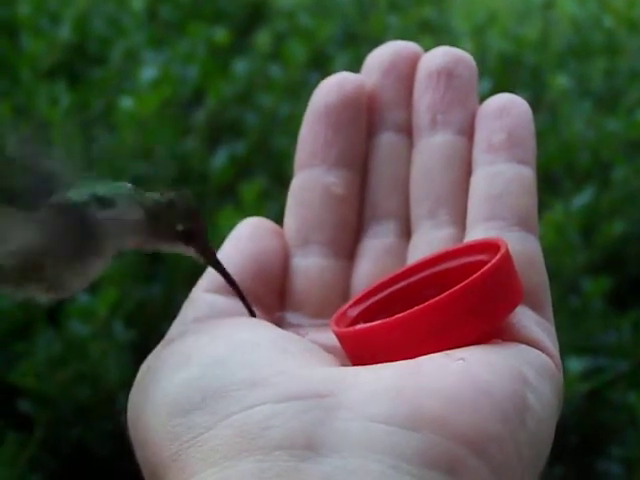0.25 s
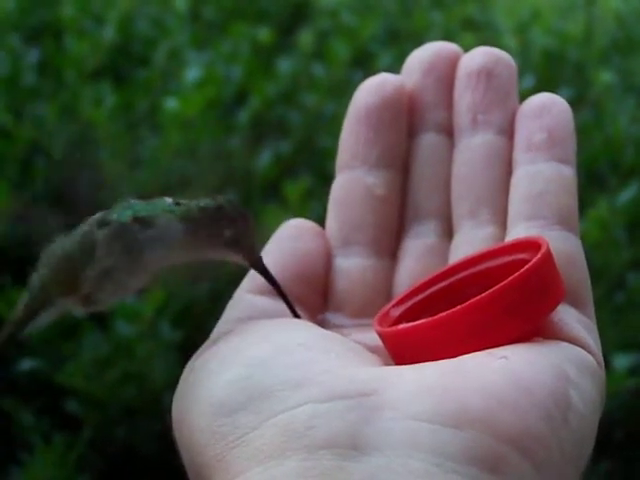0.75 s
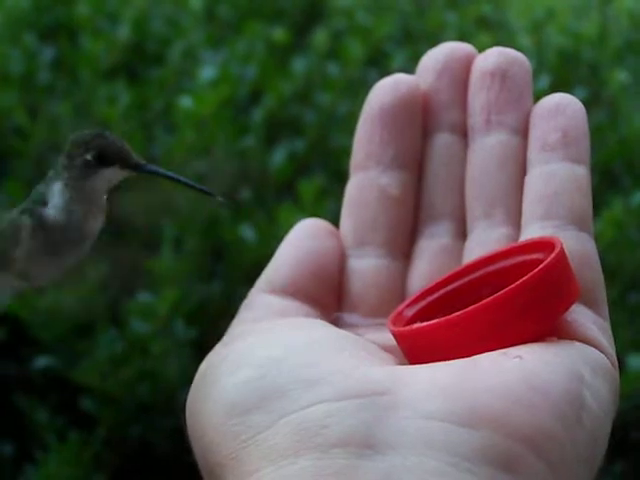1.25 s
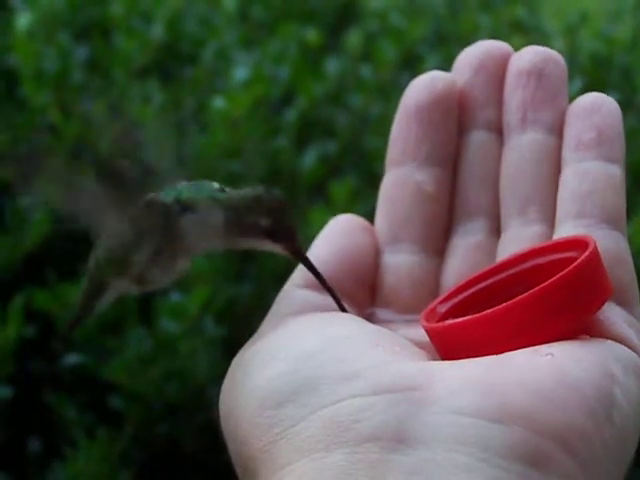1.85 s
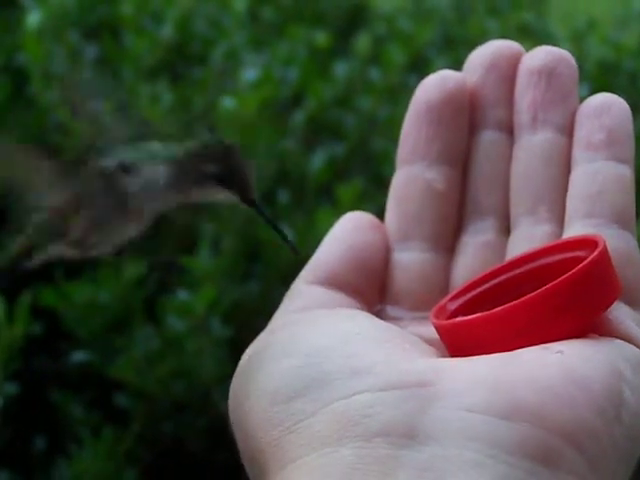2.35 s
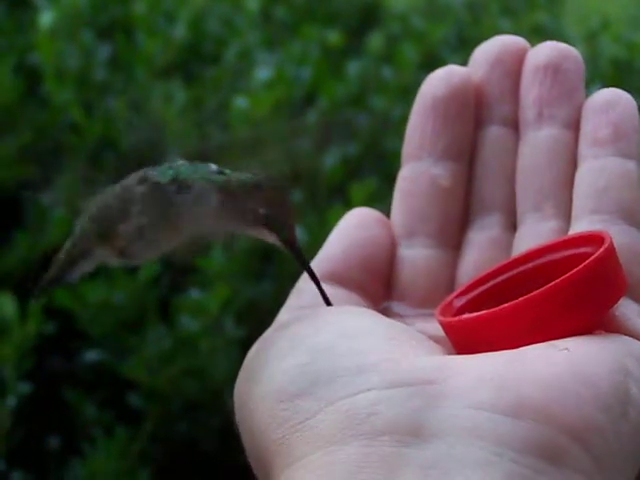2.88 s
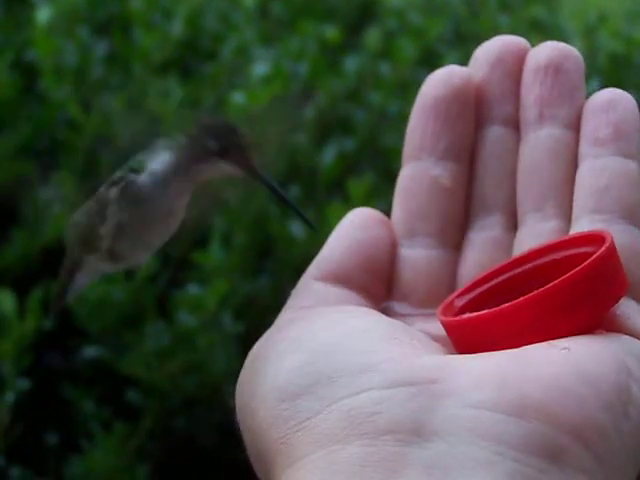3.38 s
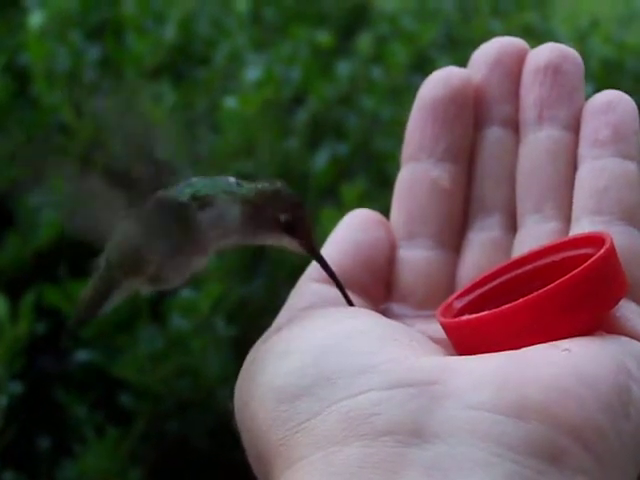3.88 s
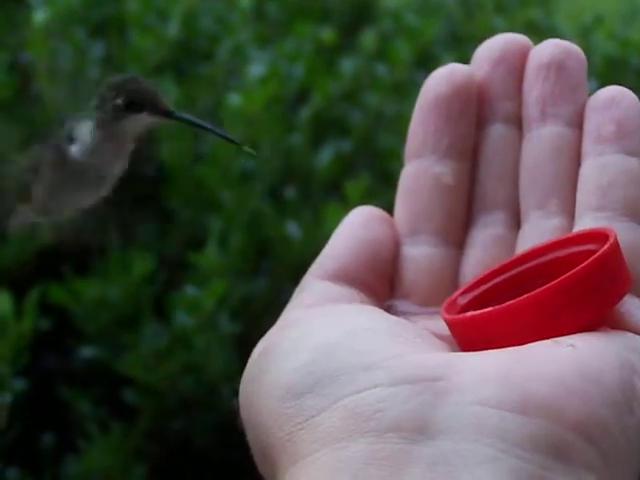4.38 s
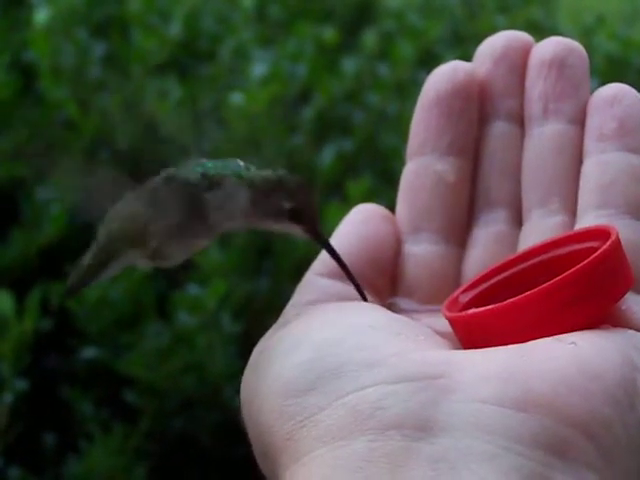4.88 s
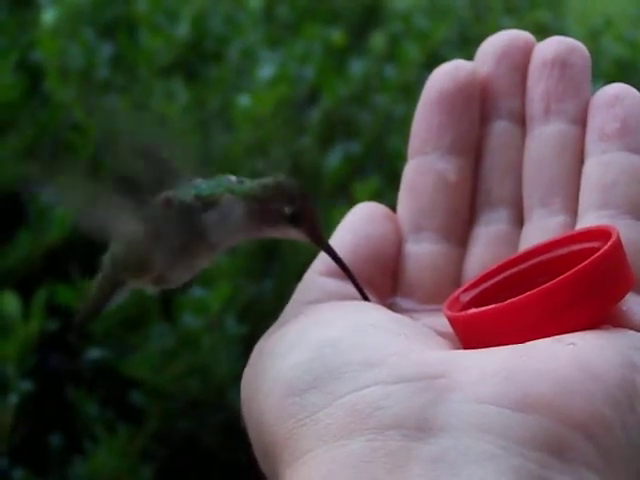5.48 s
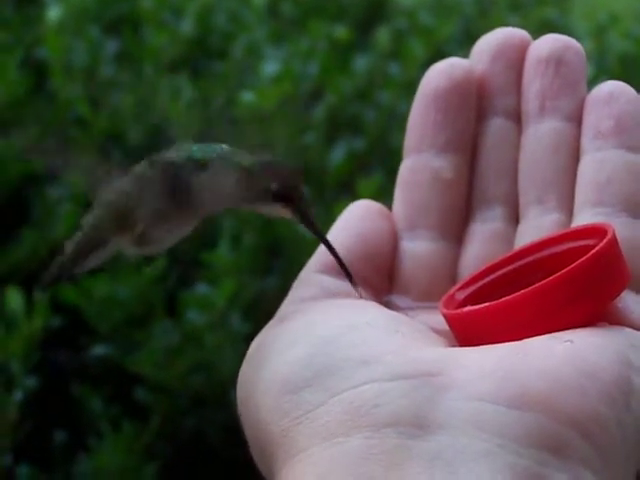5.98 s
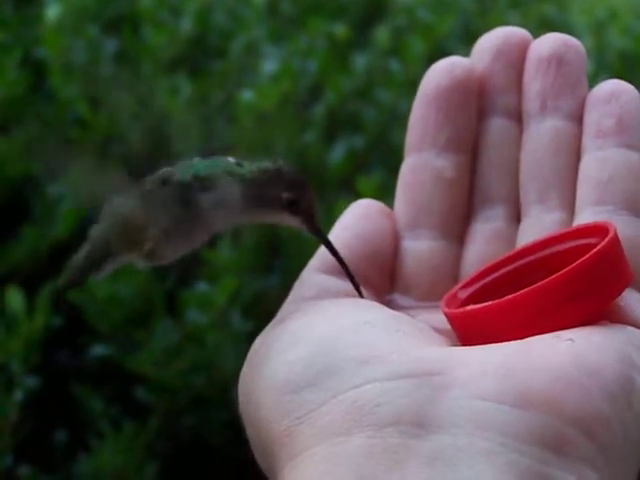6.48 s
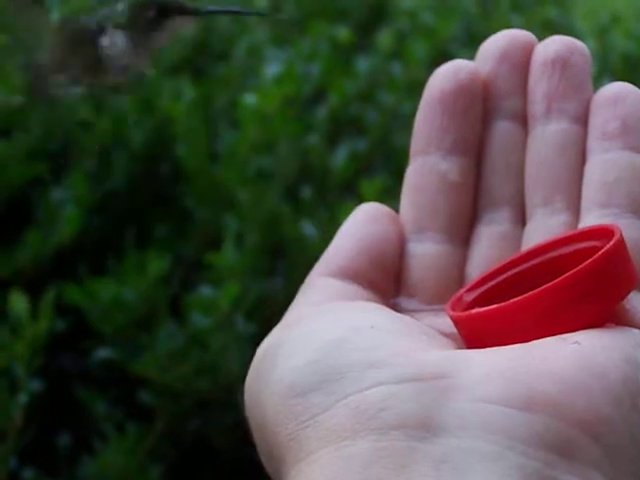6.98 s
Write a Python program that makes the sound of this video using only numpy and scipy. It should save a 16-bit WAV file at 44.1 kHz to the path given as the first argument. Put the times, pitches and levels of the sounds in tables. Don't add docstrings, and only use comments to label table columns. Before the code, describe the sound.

A hummingbird hovers close by with a low buzzing wing hum and airy feather whistle, flicking in quick darts over a faint insect drone.

```python
import sys
import numpy as np
from scipy import signal
from scipy.fft import rfft, irfft
from scipy.io import wavfile

SR = 44100
rng = np.random.default_rng(int(sys.argv[2]) if len(sys.argv) > 2 else 0)


def put_to_file(sound):
    columns = np.atleast_2d(sound).T
    safe = np.clip(columns, -1, 1)
    whole_steps = np.round(safe * 32767)
    wavfile.write(sys.argv[1], SR, whole_steps.astype(np.int16))


def gain_from_decibels(decibels):
    exponent = np.asarray(decibels, float) / 20
    return 10 ** exponent


N = 319725

# back_s, upright_until_s, dart_in_s, back_surge_beats_per_s, in_surge_beats_per_s
BREAKS = [
    (-0.4, 0.152, 0.273, 0.0, 3.05),
    (0.927, 1.308, 1.419, 2.18, 1.46),
    (1.955, 2.434, 2.416, 5.88, 0.9),
    (3.004, 3.433, 3.5, 2.54, 4.8),
    (4.141, 4.606, 4.583, 4.06, 2.69),
    (5.564, 5.887, 6.012, 2.6, 1.5),
    (6.83, 7.071, 7.067, 3.02, 4.0),
]
# time_s, nearness_db, side_on_db, effort_db
PLACE = [(0, -0.5, -1, 1), (.6, -0.5, 1.5, 1.5), (.9, 0.5, -1.5, -0.5), (1.5, -0.5, -2, 1),
         (1.9, 0.5, -1.5, -0.5), (2.3, -2, -3, 1.5), (2.45, -1, -11, 1.5), (3.0, 0, -9.5, -1),
         (3.45, -0.5, -3, 0), (3.7, 1, -1.5, -0.5), (4.1, 0, -4.5, -0.5), (4.7, -.5, -2.5, -0.5),
         (5.45, 0, 0.5, -0.5), (6.0, -1.5, -1, 1.5), (6.5, 1.5, 1, -1.5), (6.78, 0, 1.5, -1),
         (7.05, -4, -3, -5), (7.25, -5, -5, -4.5)]


def evened(x):
    return x / np.sqrt(np.mean(x ** 2) + 1e-20)


def columns(rows):
    s, *values = np.transpose(rows)
    return [np.interp(np.arange(N) / SR, s, v) for v in values]


def bumps(rows):
    s, length, *sizes = np.transpose(rows)
    t = np.arange(0, N + 99, 100) / SR
    bells = np.exp(-((t[:, None] - s) / length) ** 2)
    return [np.interp(np.arange(N) / SR, t, bells @ size) for size in sizes]


def coloured(points):
    hz, db = np.transpose(points)
    bins_hz = np.fft.rfftfreq(N, 1 / SR)
    gain = gain_from_decibels(np.interp(np.log(bins_hz + 1), np.log(hz + 1), db))
    return evened(irfft(rfft(rng.standard_normal(N)) * gain, N))


def wander(per_s):
    steps = rng.standard_normal(2000)
    return np.interp(np.arange(N) / SR * per_s, np.arange(2000), steps)


def resonate(x, hz, width):
    turn = np.exp(2j * np.pi * np.cumsum(hz * np.ones(N)) / SR)
    r = np.exp(-np.pi * width / SR)
    return 2 * (turn * signal.lfilter([1 - r], [1, -r], x / turn)).real


def ring(drive, hz, width):
    return resonate(resonate(drive, hz, width), hz, width)


def upright():
    tilt_s, lag_s = .08, .05
    t = np.arange(N) / SR
    pose = np.zeros(N)
    for back, until, *_ in BREAKS:
        pose += np.clip((t - back - lag_s) / tilt_s, 0, 1) * np.clip((until - t) / tilt_s, 0, 1)
    return pose


def wingbeat():
    # time_s, beats_per_s
    beat = [(0.0, 49.42), (0.08, 49.87), (0.33, 48.27), (0.604, 48.28), (0.809, 49.94), (1.483, 48.88),
            (1.78, 49.74), (2.63, 49.28), (3.646, 49.52), (3.93, 48.64), (4.78, 50.09), (5.47, 50.93),
            (6.08, 49.45), (6.706, 52.43), (6.88, 48.35), (7.25, 44.04)]
    first_turn, upright_sag_per_s, surge_s = .083, 2.994, .045
    darts = []
    for back, _, dart_in, back_surge, in_surge in BREAKS:
        darts += [(back, surge_s, back_surge), (dart_in, surge_s, in_surge)]
    rate = columns(beat)[0] - upright_sag_per_s * upright() + bumps(darts)[0]
    return first_turn + np.cumsum(rate) / SR


def hum_levels():
    # start_s, length_s, strength_db
    pushes = [
        (.15, .06, 6.5),
        (1.06, .06, 4),
        (1.3, .05, 8),
        (2.32, 0.047, 3.5),
        (3.35, .05, 2.5),
        (4.55, .04, 1.5),
        (5.72, .04, 3),
        (5.87, .04, 5),
        (6.95, .04, 6),
    ]
    # start_s, length_s, depth_db
    stalls = [
        (.25, .04, -4.5),
        (.94, .04, -3.5),
        (2.05, .04, -2),
        (3.05, .03, -2.5),
        (3.5, 0.056, -2.5),
        (4.16, 0.024, -7),
        (4.63, 0.035, -1.5),
        (5.61, 0.034, -4.5),
        (6.84, 0.054, -9),
        (7.06, .03, -4),
    ]
    # feeding_db, upright_change_db, db_per_push_db, db_per_stall_db, db_per_side_on_db
    lift = [-49.5, 0, 0.4, 1.5, 0]
    uneven = [-57.5, 2.5, 0.97, .6, 0.7]
    fourth = [-61.3, 4.5, .7, 1.8, 1.2]
    fifth = [-61, -2.5, 0.37, 1, -0.13]
    eighth = [-66.3, 0., .6, 2., .5]
    near_db, side_db, _ = columns(PLACE)
    pose = upright()
    controls = np.array([np.ones(N), pose, bumps(pushes)[0], bumps(stalls)[0], side_db * (1 - pose)])
    return near_db + np.array([lift, uneven, fourth, fifth, eighth]) @ controls


def hum(turns):
    # multiple, hum_level_followed (whole part, from 1), level_db against it
    minor = [(3, 1, -15.5), (6, 4.4, -10.5), (7, 4, -10), (8, 5, 0), (9, 2.9, -22), (10, 4, -18.5)]
    levels = hum_levels()
    odd_lead, even_lag = .4, .6 + .6 * upright()
    out = np.zeros(N)
    for k, follows, db in [(2, 1, 0), (1, 2, 0), (4, 3, 0), (5, 4, 0)] + minor:
        lead = 1.4 * np.log(k / 2)
        if k > 2:
            lead = lead + (odd_lead if k % 2 else -even_lag)
        flutter = 0.065 * abs(k - 2) * wander(25)
        gain = gain_from_decibels(levels[int(follows) - 1] + db + 0.22 * k * wander(20))
        out += np.sqrt(2) * gain * np.cos(2 * np.pi * k * turns + lead + flutter)
    return out


def stroke(turns, peak, rise, fall, vary_db):
    u = (turns - peak + .5) % 1 - .5
    size_db = vary_db * rng.standard_normal(500)[np.floor(turns - peak + 1.5).astype(int)]
    return gain_from_decibels(size_db) * np.exp(-(u / np.where(u < 0, rise, fall)) ** 2)


def feather_controls():
    # start_s, length_s, whistle_db, swish_db
    strains = [(.155, 0.036, 7.5, 5), (.5, .03, 4, 1.5), (.57, .03, -6.5, -1), (.68, 0.032, 3, 2),
               (.85, .04, 2.5, 2.5), (1.05, .04, 0.5, 2), (1.3, .04, 4, 4), (1.37, 0.031, -9, -5),
               (1.43, .03, -1.5, 4), (1.985, 0.037, 8, 8), (2.43, 0.035, 2.5, 4), (3.0, .04, 0, 3),
               (3.37, 0.032, 4, 1.5), (3.45, .03, -5, 0.5), (3.56, .05, 3.5, 1), (3.7, .03, 5, 3),
               (4.13, 0.034, -2, 5), (4.3, .04, 1, -1.5), (4.55, .03, -2, -3.5), (4.62, .04, 4, 2),
               (5.72, .04, 3.5, 0), (5.8, .025, -5, -5), (5.87, 0.038, 5.5, 2.5), (6.48, 0.035, -8, 0),
               (6.82, 0.044, -1, 5.5), (6.95, .03, 7, 0.5)]
    effort_db = columns(PLACE)[2]
    strain_db, swish_db = bumps(strains)
    pose = upright()
    whistle_level_db = -53 + effort_db + strain_db
    swish_level_db = -64 + 0.35 * effort_db + swish_db
    pitch_hz = 3575 - 60 * pose
    upstroke_db = -8.5 - pose
    tips_db = -8.5 - .6 * strain_db + 0.77 * swish_db + 1.7 * wander(9)
    return whistle_level_db, swish_level_db, pitch_hz, upstroke_db, tips_db


def feathers(turns):
    # pitch_factor, width_hz, level_db
    vane_modes = [
        (1., 365, 8),
        (0.875, 330, -2),
    ]
    # pitch_hz, width_hz, level_db
    tip_modes = [
        (3953, 220, 2.5),
        (4315, 170, -2.5),
    ]
    # pitch_hz, level_db
    swish_colour = [(1700, -40.5), (2100, -0.5), (2500, 5), (2850, 2), (3600, 8.5), (4600, 0.5), (5300, -2),
                    (6600, -2.5), (7200, -4.5), (8000, -12.5), (9300, -17)]
    # pitch_hz, level_db
    low_colour = [(600, -39.5), (900, -15), (1600, 3), (2000, -2), (2300, -41)]
    whistle_db, swish_db, hz, up_db, tips_db = feather_controls()

    down = stroke(turns, peak=.765 + .04 * upright(), rise=.04, fall=.14, vary_db=1.5)
    up = stroke(turns, peak=0.21, rise=.06, fall=.13, vary_db=2.)
    speed = down + gain_from_decibels(up_db) * up
    glide = .03 * np.sin(4 * np.pi * (turns - .84))
    pitch = hz * (1 + .014 * wander(50) - glide)
    flutter = np.cos(2 * np.pi * np.cumsum(pitch * (1 + .04 * wander(120))) / SR)
    turbulence = (speed + 0.1) * rng.standard_normal(N)
    drive = turbulence + .25 * speed * flutter

    vanes, tips = np.zeros(N), np.zeros(N)
    for k, (factor, width, db) in enumerate(vane_modes):
        vanes += (-1) ** k * gain_from_decibels(db) * ring(drive, pitch * factor, 1.45 * width)
    for k, (tip_hz, width, db) in enumerate(tip_modes):
        tips += (-1) ** k * gain_from_decibels(db) * ring(turbulence, tip_hz, 2.3 * width)
    whistle = gain_from_decibels(-1.13) * evened(vanes) + gain_from_decibels(tips_db - 1.9) * evened(tips)

    swish = evened(gain_from_decibels(-4.5) * down + up + 0.4) * coloured(swish_colour)
    low_stroke = stroke(turns, peak=.26, rise=0.038, fall=.07, vary_db=2.2)
    low = evened(low_stroke + 0.3) * coloured(low_colour)
    near_db = columns(PLACE)[0]
    return gain_from_decibels(whistle_db) * whistle + gain_from_decibels(swish_db + 6) * swish + gain_from_decibels(-69 + near_db) * low


def downwash():
    # pitch_hz, level_db
    wash = [(5, -0.5), (20, -5), (28, 1.5), (36, -3.5), (60, -10), (100, -40)]
    # pitch_hz, level_db
    rumble = [(20, -30), (45, 1), (65, 2.5), (150, 0), (250, -10), (420, -15), (600, -26.5), (1200, -50)]
    lumps_db = -61 + 1.5 * wander(12)
    rumble_db = -57.5 + .3 * columns(PLACE)[1] + 2.5 * wander(8.2)
    return gain_from_decibels(lumps_db) * coloured(wash) + gain_from_decibels(rumble_db) * coloured(rumble)


def insects():
    # pitch_hz, level_db
    air_colour = [(300, -30), (500, -9), (950, -10), (1550, -12), (2800, -12.5), (3570, -8), (4300, -14.5),
                  (4700, -12.5), (6600, -24.5), (8000, -32), (10000, -31.5)]
    # pitch_hz, width_hz, level_db
    crickets = [
        (5140, 170, -76),
        (5320, 30, -87),
        (5675, 25, -91),
    ]
    drift_db = .6 * wander(3)
    air = gain_from_decibels(-61.5 + drift_db) * coloured(air_colour)
    for hz, width, db in crickets:
        waver_db = 3 * wander(6)
        air = air + gain_from_decibels(db + waver_db) * evened(ring(rng.standard_normal(N), hz, width))
    return air


def snap(turns):
    # first_s, count_beats, peak_db, push 1 or suck -1
    bursts = [(.146, 3, -47.5, 1), (.4903, 2, -51, 1), (1.0383, 1, -50, 1), (1.2734, 5, -48, 1),
              (1.658, 1, -48, 1), (1.8774, 1, -51, 1), (1.959, 1, -45, -1), (1.9661, 3, -43, -1),
              (2.01, 1, -44.5, -1), (3.0291, 2, -47, -1), (3.059, 1, -46, -1), (3.461, 1, -48, 1),
              (4.1427, 1, -35, -1), (4.161, 1, -42, -1), (4.2856, 1, -50, 1), (4.4355, 1, -48, 1),
              (4.522, 3, -52, 1), (5.021, 1, -47, 1), (5.5903, 2, -44.5, -1), (5.7111, 1, -48, 1),
              (5.8576, 1, -40, 1), (5.878, 1, -48, 1), (6.4933, 1, -46, 1), (6.7822, 3, -36.5, -1),
              (6.8576, 1, -41.5, 1), (6.944, 2, -42, 1), (7.0512, 1, -41.5, -1), (7.0716, 1, -48, -1)]
    flick_hz, flick_s, end_db = 341, 0.0015, -1
    train = np.zeros(N)
    for turn, db in [(0.93, -56.5), (.47, -54.5)]:
        at = np.flatnonzero(np.diff(np.floor(turns - turn)))
        train[at] = gain_from_decibels(db) * rng.standard_normal(500)[:len(at)]
    for s, beats, db, sign in bursts:
        at = np.searchsorted(turns, turns[round(s * SR)] + np.arange(round(beats)))
        ends = np.linspace(-1, 1, len(at)) ** 2 * (len(at) > 2)
        train[at] += np.sign(sign) * gain_from_decibels(db + end_db * ends)
    t = np.arange(-300, 301) / SR
    flick = np.cos(2 * np.pi * flick_hz * t) * np.exp(-(t / flick_s) ** 2)
    return signal.oaconvolve(train, flick, "same")


def clicks():
    # start_s, level_db, start_hz, end_hz, length_s
    bill = [
        (3.4962, -49, 7000, 8600, 0.0025),
        (5.253, -49, 4770, 8000, 0.011),
    ]
    out = np.zeros(N)
    for s, db, start_hz, end_hz, length in bill:
        t = np.arange(0, length, 1 / SR)
        chirp = np.sin(2 * np.pi * (start_hz * t + (end_hz - start_hz) * t ** 2 / (2 * length)))
        out[round(s * SR):][:len(t)] += gain_from_decibels(db) * chirp * np.hanning(len(t))
    return out


def scene():
    turns = wingbeat()
    bird = hum(turns) + feathers(turns) + snap(turns) + clicks()
    return (bird + downwash() + insects())[None]


def band_limit(x):
    return signal.sosfilt(signal.butter(12, 9300, fs=SR, output="sos"), x)


def record(dry):
    # pitch_hz, level_db
    roll_off = [(0, 0.5), (6700, 0), (7600, -13), (8700, -23), (9100, -32), (12000, -70.5)]
    hz, db = np.transpose(roll_off)
    slope = gain_from_decibels(np.interp(np.fft.rfftfreq(N, 1 / SR), hz, db))
    dulled = irfft(rfft(dry) * slope, N)
    return band_limit(dulled + .0021)


dry = scene()
out = record(dry)
put_to_file(out)
```